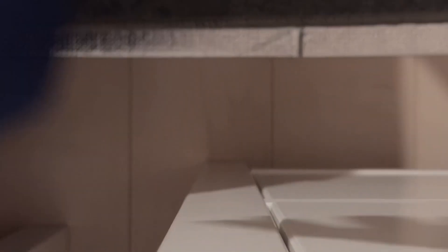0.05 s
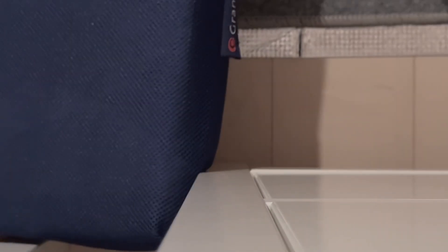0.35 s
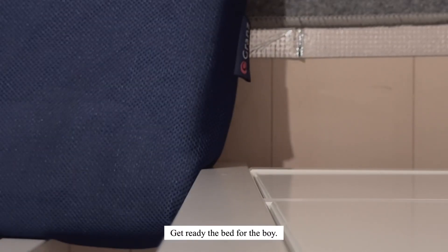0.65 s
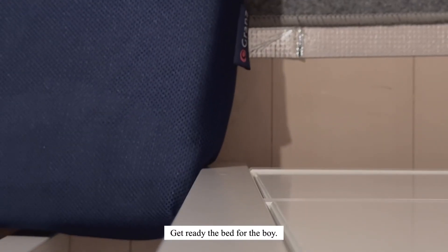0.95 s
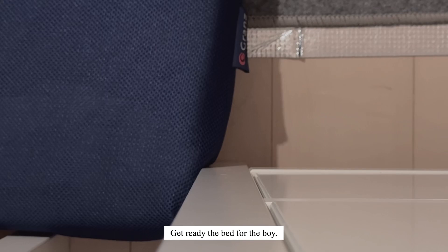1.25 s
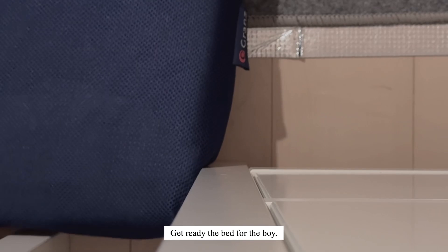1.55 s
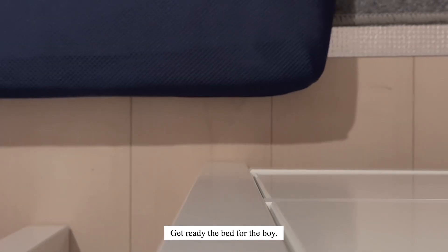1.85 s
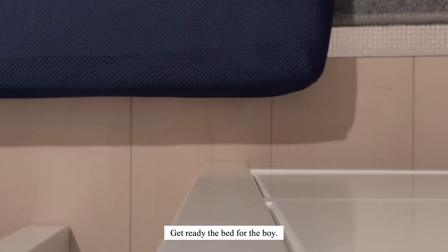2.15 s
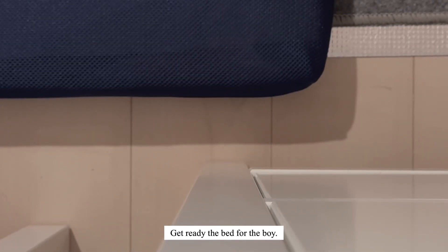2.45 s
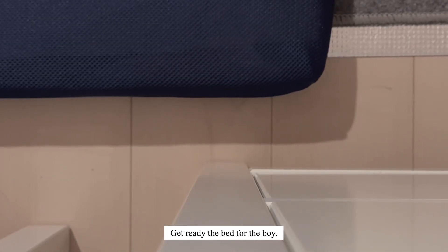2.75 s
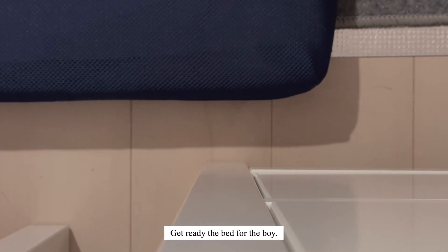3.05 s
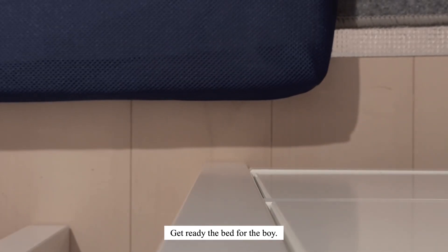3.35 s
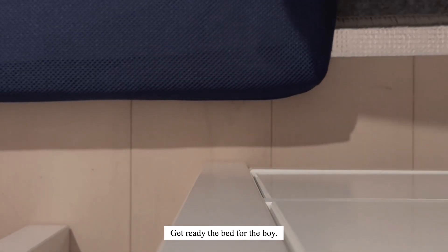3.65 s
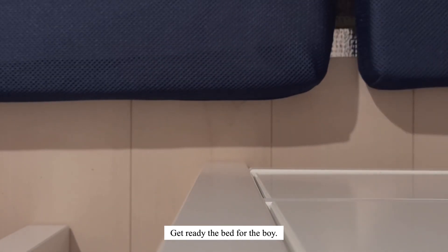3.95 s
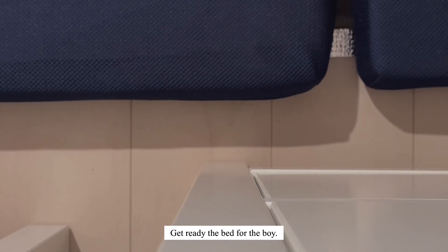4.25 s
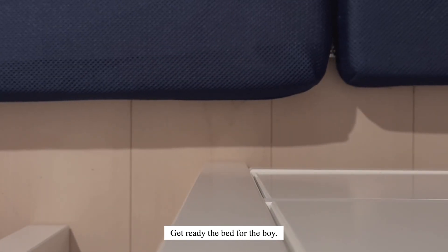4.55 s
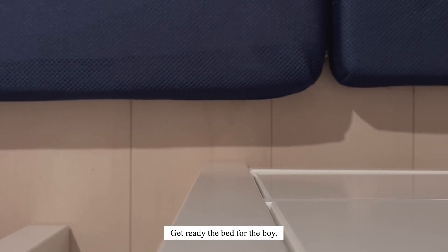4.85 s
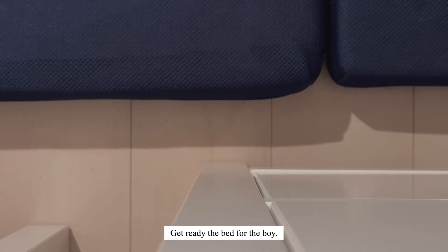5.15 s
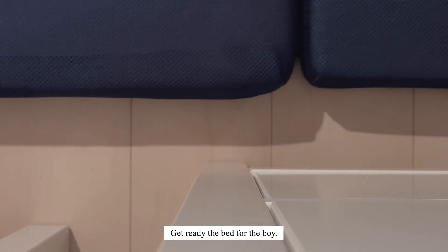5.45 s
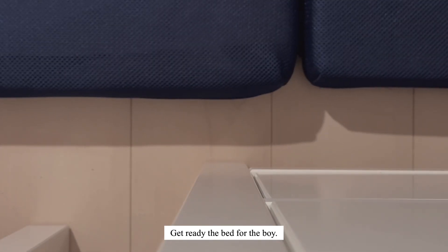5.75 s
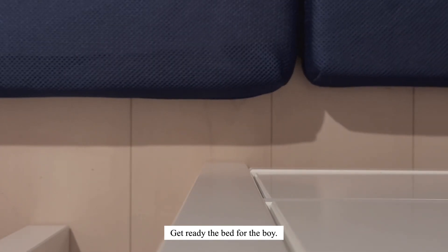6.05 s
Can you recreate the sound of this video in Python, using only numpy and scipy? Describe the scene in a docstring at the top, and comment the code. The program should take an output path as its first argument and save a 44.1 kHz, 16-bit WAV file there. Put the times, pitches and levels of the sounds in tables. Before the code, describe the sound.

Foam cushions in woven covers rustle and brush as they are pushed onto a wooden bed base, with soft thumps and small knocks.

```python
"""A small, dead room: foam cushions in woven covers are pushed into place on a wooden bed base.
Hands and covers brush in strokes, a hiss of slipping, snagging fibres. Cushions bump the boards
with a slap and a thud. Short snaps come from flicking cloth, the crack of the bumps and small knocks.
One long, fast stroke makes the weave sing; then a shoved cushion sticks and slips on the boards."""
import sys
import numpy as np
from scipy import signal
from scipy.fft import rfft, irfft, next_fast_len
from scipy.io import wavfile
from scipy.ndimage import map_coordinates

SR = 44100
rng = np.random.default_rng(int(sys.argv[2]) if len(sys.argv) > 2 else 0)


def file_out(sig):
    """Save sig as 16-bit WAV at sys.argv[1]."""
    # one column per channel
    cols = np.atleast_2d(sig).T
    # limit, then scale
    lim = np.clip(cols, -1, 1)
    pcm = np.round(lim * 32767).astype(np.int16)
    wavfile.write(sys.argv[1], SR, pcm)


N = 268569
TIME_S = np.arange(N) / SR
GRID_HZ = np.geomspace(30, 16000, 60)


def gain_of(db):
    """Decibels to amplitude."""
    return 10 ** (np.asarray(db) / 20)


def unit_rms(x):
    """Scales to an rms of one."""
    return x / np.sqrt(np.mean(x ** 2) + 1e-20)


def lookup(points, hz):
    """Interpolates a table over log frequency."""
    freq_hz, value = np.transpose(points)
    return np.interp(np.log(hz + 1), np.log(freq_hz + 1), value)


def add(mix, start_s, sound):
    """Mixes a sound in at start_s."""
    part = mix[max(round(start_s * SR), 0):][:len(sound)]
    part += sound[:len(part)]


def coloured(x, spectrum):
    """Filters x by a (freq_hz, level_db) curve; unit rms."""
    size = next_fast_len(len(x))
    gain = gain_of(lookup(spectrum, np.fft.rfftfreq(size, 1 / SR)))
    return unit_rms(irfft(rfft(x, size) * gain, size)[:len(x)])


def hump_db(hz, centre_hz, db_per_octave):
    """Rounded spectral peak with straight skirts."""
    return db_per_octave * (.5 - np.hypot(np.log2((hz + 1) / centre_hz), .5))


def wander(knots_per_s):
    """Random line-segment curve; unit rms."""
    knots = rng.standard_normal(8000)
    return unit_rms(np.interp(TIME_S * knots_per_s, np.arange(len(knots)), knots))


def resonate(x, hz, width_hz):
    """Resonance tracking the curve hz."""
    carrier = np.exp(2j * np.pi * np.cumsum(hz) / SR)
    pole = np.exp(-np.pi * width_hz / SR)
    return 2 * (carrier * signal.lfilter([1 - pole], [1, -pole], x / carrier)).real


def fibre_hiss(snags_per_s=900, spread_db=2.0, snag_gain=0.51):
    """Countless fibres slip as a hiss; some snag and let go as tiny clicks."""
    sizes = gain_of(spread_db * np.minimum(rng.exponential(1, N), 5))
    snags = sizes * rng.choice([-1, 1], N) * (rng.random(N) < snags_per_s / SR)
    return unit_rms(rng.standard_normal(N) + snag_gain * unit_rms(snags))


def stroke_swell(peak_s, rise_s, fall_s, edge_db=-10, flatness=2.1):
    """A stroke speeds up and slows: edge_db at rise_s before its peak and fall_s after."""
    distance = np.maximum((peak_s - TIME_S) / rise_s, (TIME_S - peak_s) / fall_s)
    return gain_of(edge_db * np.minimum(distance, 10) ** flatness)


def shifting_folds(x, depth_db=2.1, patch_s=.03, patch_width=.07):
    """Folds keep changing shape, so narrow colours come and go in the rub."""
    hz, t, spectra = signal.stft(x, SR, nperseg=512, noverlap=384)
    grid = np.meshgrid(np.log2(1 + hz / 700) / patch_width, t / patch_s, indexing="ij")
    patches = unit_rms(map_coordinates(rng.standard_normal((96, 512)), grid, order=1, mode="wrap"))
    return signal.istft(spectra * gain_of(depth_db * patches), SR, nperseg=512, noverlap=384)[1][:N]


# Cloth friction spectra: freq_hz, level_db
HOLLOW_SPECTRUM = [(70, -54.5), (140, 0), (260, -3), (420, 0.5), (650, 4), (1100, 0), (1700, -9.5),
                   (3500, -58.5)]
RUB_SPECTRUM = [(400, -14.5), (1000, -5), (1600, 2), (2500, 3), (4000, 2), (6000, -3.5), (8500, -11.5),
                (15000, -30.5)]
FIZZ_SPECTRUM = [(3000, -12.5), (6000, -1), (8000, 0), (10000, -2), (12500, -7), (16000, -1.5)]
# Brush strokes: peak_s, rise_s, fall_s, level_db, hollow_offset_db, fizz_offset_db
STROKES = [ (.01, .04, 0.062, -57.5, 1.5, -7.5), (.125, .06, 0.061, -54.5, -4, -1),
           (.2, 0.045, 0.088, -61.5, -0.5, -2.5), (.325, 0.055, 0.12, -54.5, -1.5, -9.5),
           (.405, 0.097, 0.077, -54.5, -11, -8.5), (.518, 0.024, 0.026, -63.5, 5, 0),
           (.68, 0.073, 0.047, -65, -3.5, 2), (.815, 0.032, 0.038, -68, -1.5, -1.5),
           (0.921, 0.071, 0.053, -59.5, -6, -5), (1.022, 0.04, 0.052, -64, -8, 3),
           (1.095, 0.023, 0.062, -68, -5, -6), (1.28, 0.032, 0.056, -56.5, -4.5, -1.5),
           (1.36, 0.035, 0.05, -64.5, -1.5, -2.5), (1.46, 0.023, .04, -71.5, -7, -5),
           (1.51, 0.022, 0.025, -61.5, -6, -7), (1.6, 0.052, 0.21, -60, -6, -2),
           (1.735, 0.07, 0.093, -52.5, -6.5, -5.5), (1.858, 0.018, 0.062, -58, 8.5, -4.5),
           (1.968, 0.024, 0.023, -66, -14, 1.5), (2.15, .15, 0.061, -68.5, -9, -6.5),
           (2.23, .04, 0.029, -56, -6.5, 1.5), (2.28, .04, 0.065, -69.5, -4, -9),
           (2.405, 0.032, 0.035, -70.5, -6.5, -4), (2.522, 0.041, 0.18, -55, -20, -2.5),
           (2.7, 0.05, 0.042, -57.5, -4, 1.5), (2.802, 0.043, 0.058, -49.5, -4.5, -3),
           (2.906, 0.062, .04, -62.5, -4.5, 1.5), (3.02, 0.057, 0.078, -50.5, -4, -10),
           (3.118, .035, .06, -48, 1, -8), (3.221, 0.061, 0.075, -48.5, -5, -9),
           (3.31, 0.044, 0.054, -56, -0.5, -7), (3.41, 0.24, 0.029, -79, 17, -2),
           (3.52, 0.092, 0.091, -67.5, -3, -3), (3.599, 0.04, 0.051, -59, -3, -1.5),
           (3.69, 0.048, 0.062, -51.5, -3.5, -3.5), (3.785, 0.065, 0.058, -56, -5, -0.5),
           (3.97, 0.1, 0.058, -71, -0.5, -4), (4.365, 0.1, 0.069, -68.5, -0.5, 0.5),
           (4.5, 0.032, 0.036, -54.5, -5.5, -3), (4.68, 0.095, 0.066, -61, -6.5, -3),
           (4.9, 0.15, 0.066, -70.5, -10, -7), (5.085, 0.066, 0.044, -60, -10, -5),
           (5.235, 0.04, 0.068, -66.5, -3.5, -4.5), (5.395, 0.069, 0.031, -55.5, -4, 1.5),
           (5.53, 0.075, 0.068, -68.5, -4.5, -5), (5.84, 0.042, 0.025, -56.5, -3, -5),
           (5.909, 0.066, 0.058, -59, -2, -5.5), (6.034, 0.049, 0.044, -61.5, 1, -4.5), ]


def brushing(grip_db=1.34, rub_offset_db=-1.6):
    """Cloth slides with uneven grip: hollow when pressed into the foam, fizzy when light and quick."""
    power = np.zeros((3, N))
    for peak_s, rise_s, fall_s, level_db, hollow_offset_db, fizz_offset_db in STROKES:
        gains = gain_of(level_db) * gain_of([hollow_offset_db, rub_offset_db, fizz_offset_db])
        power += np.outer(gains, stroke_swell(peak_s, rise_s, fall_s)) ** 2
    hollow, rub, fizz = np.sqrt(power)
    sound = hollow * coloured(fibre_hiss(), HOLLOW_SPECTRUM)
    sound += rub * coloured(fibre_hiss(), RUB_SPECTRUM)
    sound += fizz * coloured(fibre_hiss(), FIZZ_SPECTRUM)
    return shifting_folds(sound) * gain_of(grip_db * wander(90))


# Modes of the loaded wooden base: pitch_hz, level_db, t60_s
BASE_MODES = [(122, -12, 0.74), (172.1, -6, 0.15), (230, -10.5, 0.081), (320, 0, 0.05), (375, -0.5, 0.073),
              (503, -10, .06), (555, -2, 0.059), (650, -2, 0.024), (784, -20, 0.031), (1038, 2, 0.031),
              (1270, -17.5, 0.065), (1580, -3, .06), (2527, -6.5, 0.11)]
# Cushion-on-board contact spectrum: freq_hz, level_db
CONTACT_SPECTRUM = [(60, -45), (120, 8), (200, 3.5), (700, -2), (1200, -8), (4000, -17), (16000, -20)]


def blow(centre_hz, settle_s, puff_db, thud_db, rise_s, ring_db=-6, db_per_octave=13, decay_cycles=14):
    """A damped thud rings the base modes near centre_hz while the foam settles with a dull puff."""
    t = np.arange(SR // 2) / SR
    ring = np.zeros(len(t))
    for pitch_hz, level_db, t60_s in BASE_MODES:
        mode_db = level_db + hump_db(pitch_hz, centre_hz, db_per_octave) - 60 * t / t60_s
        ring += gain_of(mode_db) * np.sin(2 * np.pi * pitch_hz * t)
    colour_db = lookup(CONTACT_SPECTRUM, GRID_HZ) + hump_db(GRID_HZ, centre_hz, db_per_octave)
    puff = coloured(rng.standard_normal(len(t)), np.c_[GRID_HZ, colour_db])
    thud = np.sin(2 * np.pi * centre_hz * t) * np.exp(-t * centre_hz / decay_cycles)
    settling = np.exp(-(t / (1.34 * settle_s)) ** 1.56)  # damping grows towards rest
    foam = (gain_of(puff_db) * puff + gain_of(thud_db) * thud) * settling
    return np.minimum(t / rise_s, 1) * (gain_of(ring_db) * ring + foam)


# Cushion bumps: start_s, slap_db, slap_hz, thud_db, thud_hz, settle_s
BUMPS = [ (0.084, -55, 700, -54, 185, .009), (0.139, -36, 726, -29, 241, 0.018),
         (.513, -46, 420, -37, 163, 0.016), (0.625, -44, 1370, -46.5, 131.5, .018),
         (1.87, -20, 642, -24.5, 378.3, 0.026), (2.059, -68, 500, -61, 159, 0.015),
         (2.2, -42, 2290, -54, 154.5, 0.038), (2.691, -43.5, 615, -70, 206, 0.032),
         (2.829, -39, 846, -58, 169, 0.034), (2.952, -28, 701, -29.5, 161.2, 0.032),
         (3.104, -40, 628, -42.5, 231, 0.064), (3.675, -61, 600, -49, 203, 0.044),
         (3.769, -39.5, 433, -44.5, 222, 0.04), (3.872, -56.5, 510, -54.5, 174, 0.015),
         (3.991, -70.5, 500, -55, 142, 0.024), (4.23, -79, 400, -54, 202, 0.0098),
         (4.524, -56, 497, -42.5, 142, 0.0049), (4.684, -52, 700, -53.5, 184, 0.023),
         (5.201, -69, 1500, -63, 138, 0.046), (5.43, -71, 500, -58.5, 128, 0.0093),
         (5.792, -48.5, 1000, -55.5, 336, 0.025), (5.88, -54, 900, -59.5, 157, 0.032),
         (6.009, -39, 528, -51, 181, 0.03), ]


def bumps(sink_s=.003, slap_share=0.46, rock_hz=129.5, rock_db=-13):
    """The cover slaps the boards; then the foam sinks in with a lower thud and rocks the base."""
    out = np.zeros(N)
    for start_s, slap_db, slap_hz, thud_db, thud_hz, settle_s in BUMPS:
        slap = blow(slap_hz, slap_share * settle_s, puff_db=-7, thud_db=-7, rise_s=0.0018)
        thud = blow(thud_hz, settle_s, puff_db=-7.5, thud_db=-2, rise_s=.003, ring_db=-10)
        rock = blow(rock_hz, settle_s, puff_db=-0.5, thud_db=-4, rise_s=0.0011, ring_db=-20)
        add(out, start_s, gain_of(slap_db) * slap)
        add(out, start_s + sink_s, gain_of(thud_db) * (thud + gain_of(rock_db) * rock))
    return out


# Short snaps: start_s, level_db, centre_hz, decay_s
SNAPS = [ (.086, -45, 1190, 0.0058), (0.14, -42.5, 1280, 0.0024), (0.625, -47, 3800, .0045),
         (.666, -43.5, 6850, 0.012), (.792, -61.5, 1920, 0.033), (1.113, -59.5, 5330, 0.0066),
         (1.199, -61.5, 2100, 0.016), (1.219, -58.5, 5700, 0.029), (1.31, -49.5, 7450, 0.0066),
         (1.866, -34, 2200, 0.011), (2.0, -60.5, 2160, 0.016), (2.054, -64.5, 4500, 0.008),
         (2.196, -53, 2160, 0.015), (2.464, -61, 1400, 0.013), (2.683, -47, 1490, 0.016),
         (2.944, -39, 3100, 0.021), (3.096, -41, 5200, .013), (3.174, -44, 12500, 0.011),
         (3.675, -57, 2500, 0.0079), (3.767, -45.5, 2800, .009), (3.784, -36.5, 3950, 0.00067),
         (4.399, -60, 2080, 0.019), (4.4879, -42.5, 5070, 0.0019), (4.685, -53, 3400, 0.0097),
         (5.2, -60.5, 1890, 0.01), (5.233, -56.5, 830, 0.011), (5.346, -49, 1350, 0.0099),
         (5.369, -47, 1340, 0.0032), (5.785, -51.5, 1400, 0.0047), (5.877, -49.5, 1850, 0.0061),
         (5.906, -44, 1540, 0.003), (6.005, -43, 1870, 0.012), ]


def snaps(db_per_octave=9.5, rise_share=0.28):
    """Flicking cloth, the crack of cushion bumps and small knocks: each a brief noise burst."""
    out = np.zeros(N)
    t = np.arange(SR // 5) / SR
    for start_s, level_db, centre_hz, decay_s in SNAPS:
        spectrum = np.c_[GRID_HZ, hump_db(GRID_HZ, centre_hz, db_per_octave)]
        burst = coloured(rng.standard_normal(len(t)), spectrum)
        rise_s = rise_share * decay_s
        envelope = np.minimum(t / rise_s, 1) * np.exp(-np.maximum(t - rise_s, 0) / decay_s)
        add(out, start_s, gain_of(level_db) * burst * envelope)
    return out


# Whistles of the weave's ribs: thread_rate_ratio, level_db
RIB_WHISTLES = [(0.457, -3.5), (.705, -7), (1, -2), (1.21, -13)]


def singing_weave(start_s=2.485, length_s=0.37, level_db=-60.5, peak_hz=10500, width_hz=430):
    """Threads crossed at speed give a fuzzy whistle, with weaker ones from the pattern's other ribs."""
    progress = np.clip((TIME_S - start_s) / length_s, 0, 1)
    arch = np.sin(np.pi * progress ** 0.59)  # the stroke is fastest early
    sag = 1 - .04 * (1 - arch)
    flutter = 1 + 0.0031 * wander(60)
    thread_hz = peak_hz * sag * flutter
    whistles = np.zeros(N)
    for ratio, rib_db in RIB_WHISTLES:
        band = rng.standard_normal(N)
        for _ in range(2):
            band = resonate(band, thread_hz * ratio, width_hz * ratio)
        whistles += gain_of(rib_db) * unit_rms(band)
    return gain_of(level_db) * np.sqrt(abs(arch)) * whistles


def judder(start_s=2.922, rise_s=0.032, hold_s=0.25, level_db=-43.5, fade_db_per_s=77,
           slip_hz=158, jitter=0.1704, lurch_hz=12.46, lurch_peak_s=3.132, lurch_db=4, uneven_db=3.5):
    """A shoved cushion sticks and slips at an unsteady rate: a drone that lurches regularly and fades."""
    t = TIME_S - start_s
    phase = 2 * np.pi * np.cumsum(slip_hz * (1 + jitter * wander(260))) / SR
    drone = np.sin(phase) + 0.24 * np.sin(2 * phase)
    push_db = level_db - fade_db_per_s * np.maximum(t - hold_s, 0)
    lurch = np.cos(2 * np.pi * lurch_hz * (TIME_S - lurch_peak_s))
    envelope = gain_of(push_db + lurch_db * lurch + uneven_db * wander(150))
    return np.clip(t / rise_s, 0, 1) * envelope * drone


# Room decay: freq_hz, t60_s
ROOM_DECAY = [(120, 0.24), (400, 0.12), (2000, 0.042), (12000, 0.083)]


def room(x, echoes_per_s=2500):
    """Close walls: sparse reflections that die faster in the treble than in the bass."""
    taps = rng.standard_normal(SR // 2) * (rng.random(SR // 2) < echoes_per_s / SR)
    taps[:SR // 250] = 0  # 4 ms pre-delay
    hz, t, spectra = signal.stft(taps, SR, nperseg=256)
    decay = gain_of(-60 * t / lookup(ROOM_DECAY, hz)[:, None])
    tail = signal.istft(spectra * decay, SR, nperseg=256)[1]
    return signal.fftconvolve(x, tail / np.linalg.norm(tail))[:N]


# Still-room noise spectrum: freq_hz, level_db
ROOM_TONE_SPECTRUM = [(30, -41), (65, -25.5), (120, -0.5), (190, -1), (280, -6.5), (430, -9), (1000, -11.5),
                      (1500, -16.5), (4100, -20), (15500, -33)]


def scene(room_db=-16, room_tone_db=-76):
    """Cloth and cushions close by, over the quiet of the room."""
    near = brushing() + bumps() + snaps() + singing_weave() + judder()
    reflections = gain_of(room_db) * room(near)
    room_tone = gain_of(room_tone_db) * coloured(rng.standard_normal(N), ROOM_TONE_SPECTRUM)
    return (near + reflections + room_tone)[None]


def record(dry, low_cut_hz=122, leak_db=-38, high_cut_hz=15900):
    """Steep microphone bass cut with a slight leak, then the band limit."""
    highpass = signal.butter(8, low_cut_hz, "high", fs=SR, output="sos")
    lowpass = signal.firwin(511, high_cut_hz, window=("kaiser", 9), fs=SR)
    thinned = signal.sosfilt(highpass, dry) + gain_of(leak_db) * dry
    return signal.oaconvolve(thinned, lowpass[None], "same")


dry = scene()
out = record(dry)
file_out(out)
```